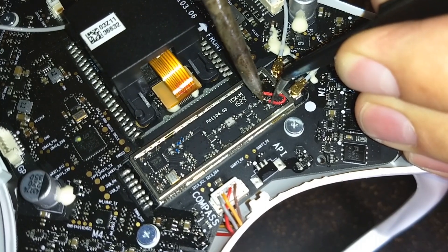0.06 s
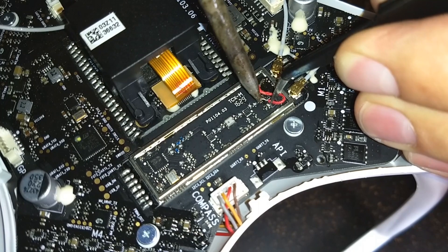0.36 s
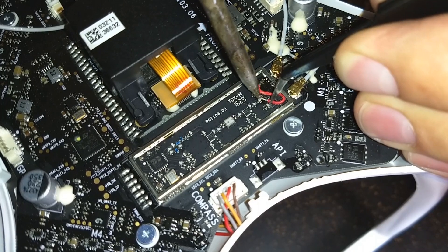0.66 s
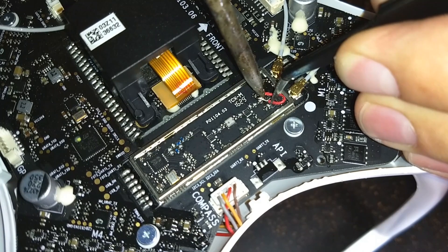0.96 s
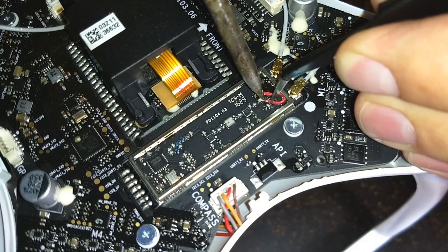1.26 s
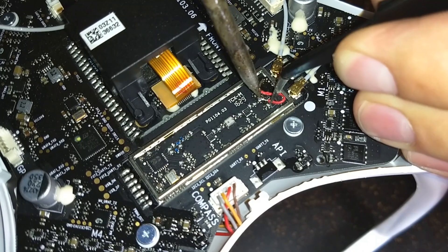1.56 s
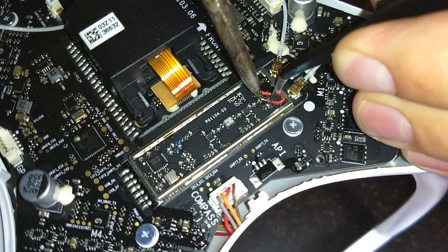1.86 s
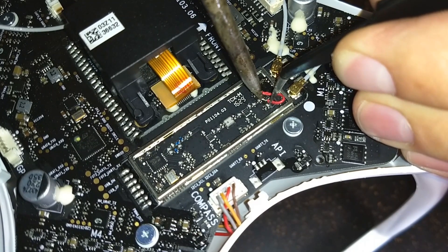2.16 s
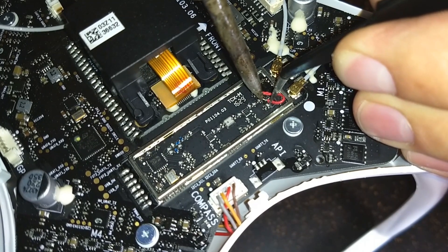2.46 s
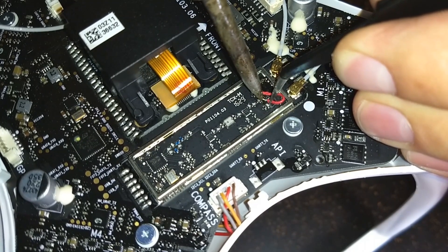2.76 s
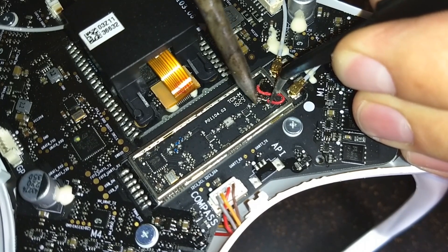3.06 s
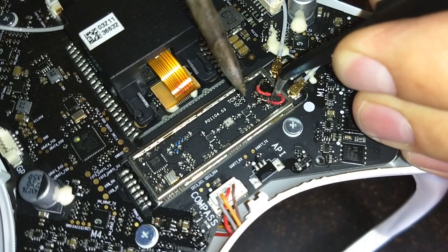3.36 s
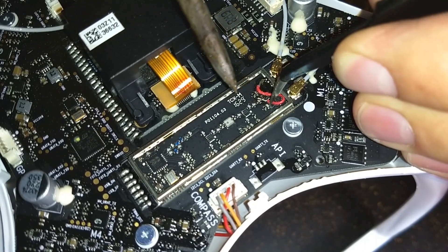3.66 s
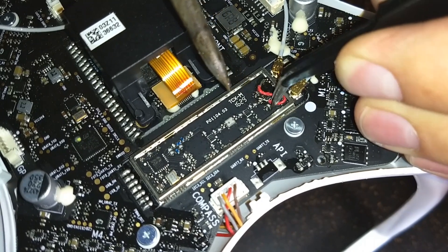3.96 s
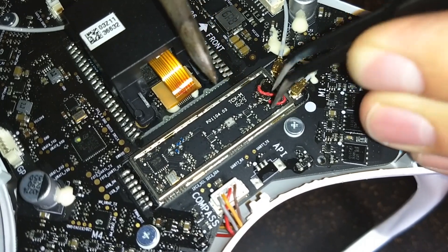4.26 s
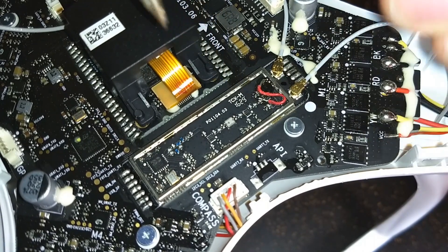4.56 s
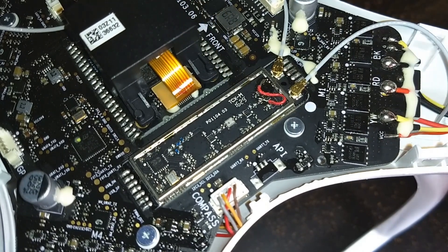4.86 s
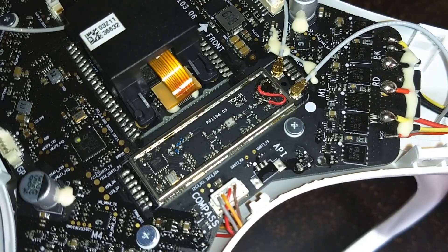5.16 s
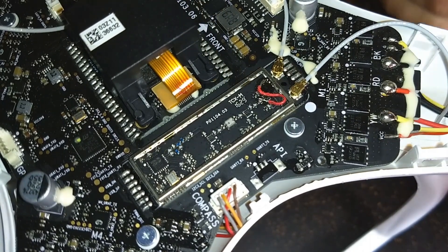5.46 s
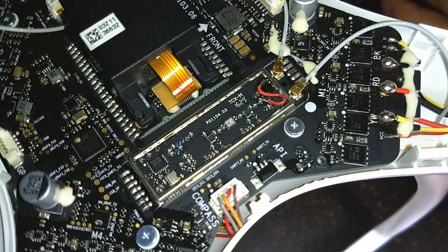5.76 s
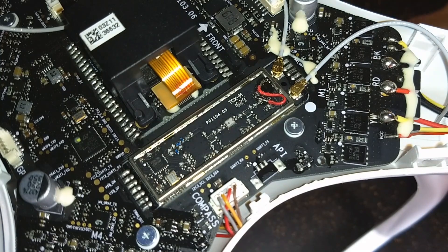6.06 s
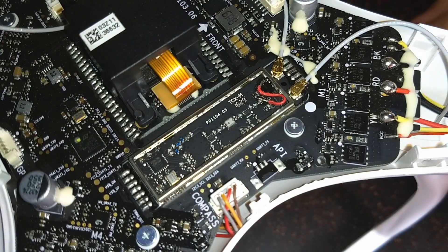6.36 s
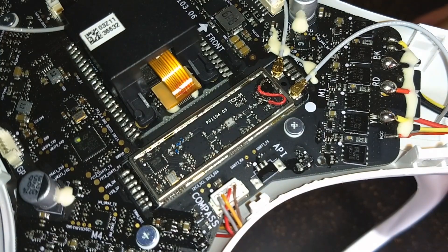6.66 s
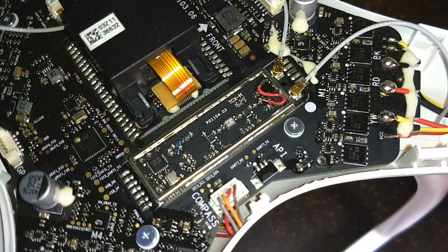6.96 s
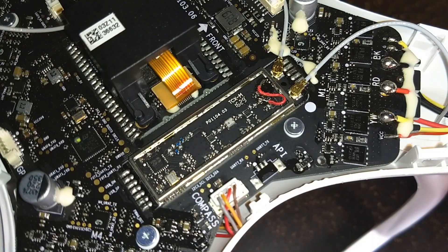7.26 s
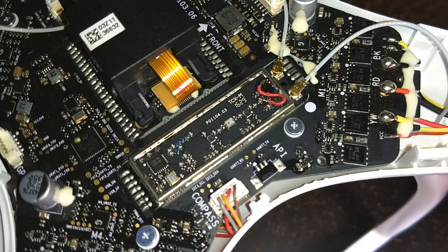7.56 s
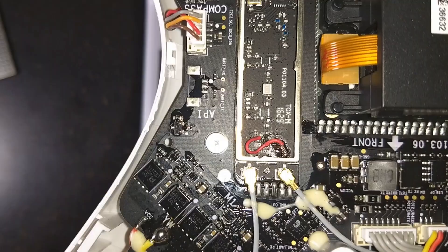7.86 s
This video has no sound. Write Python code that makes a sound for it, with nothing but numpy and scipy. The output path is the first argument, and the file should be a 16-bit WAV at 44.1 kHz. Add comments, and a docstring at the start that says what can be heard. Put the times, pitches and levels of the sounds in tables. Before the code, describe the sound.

Tiny crackles of sizzling flux and a few light tool taps on a circuit board are heard close up, over soft fan noise and electrical hum indoors. Cloth rustles faintly. Then the loudest sound: a soldering iron knocks, scrapes and clanks into its metal holder, rattling briefly. A sleeve rasps on the bench, and a dull bump with small clicks hits the microphone at the end.

```python
"""Soldering at the bench

A wire is soldered to a circuit board in a quiet, humming room: flux spits, iron and tweezers tick.
The iron knocks on its metal stand, slides in with a groan and drops home with a clank and a rattle.
A hand draws back, a sleeve brushes by, a finger bumps the camera and the sound cuts out for a moment.
The camera widens its two microphones by cross-feed."""
import sys
import numpy as np
from scipy import signal
from scipy.fft import rfft, irfft, next_fast_len
from scipy.io import wavfile
from scipy.ndimage import map_coordinates

SR = 44100
rng = np.random.default_rng(int(sys.argv[2]) if len(sys.argv) > 2 else 0)


def output_pcm(signal):
    """Save a mono or channel-first signal as 16-bit PCM at the path in sys.argv[1].

    Samples are clipped to [-1, 1] before scaling.
    """
    pcm = np.clip(np.atleast_2d(signal).T, -1, 1) * 32767
    wavfile.write(sys.argv[1], SR, np.round(pcm).astype(np.int16))


N = 349272
TIME = np.arange(N) / SR
EVENT_TIME = np.arange(SR // 2) / SR


# the iron hitting its stand: start_s, level_db, cutoff_hz, rattle_t60_s, base_db, holder_db, thud_db
STAND_HITS = [(5.7802, -20, 1510, 0.037, -31, -16, -10), (5.939, -48, 720, 0.03, -14, 0, -10),
              (6.123, -45.5, 700, 0.035, -25, -1.5, 2), (6.2005, -28, 7000, 0.01, -40, -40, -30),
              (6.2017, -8.5, 6740, 0.039, -28.5, -42, -23), (6.2486, -12.5, 13000, 0.051, -25, -35, -18),
              (6.2553, -16, 14000, 0.044, -29.5, -28, -20), (6.2609, -15.5, 9000, 0.06, -26, -29, -21),
              (6.269, -20.5, 4500, 0.097, -21, -27, -13)]
# tone of the clank: freq_hz, gain_db
CLANK_EQ = [(60, -15), (150, -3.5), (280, -9.5), (430, 1.5), (650, -5.5), (1100, -4), (1500, -2.5),
            (1850, -5.5), (2300, 6), (3100, -1.5), (4200, -10.5), (6000, -17.5), (9000, -22.5),
            (14000, -32)]
# ring of the stand's base: pitch_hz, level_db, t60_s
BASE_MODES = [(318, -7, 0.19), (408, 1, 0.14), (448, 6, 0.17), (567, -6, 0.19), (815, -4, 0.25),
              (837, -2, 0.26), (987, -2.5, 0.23), (1052, 0, 0.13), (1137, 0, 0.083), (1300, -22, 0.14),
              (1416, -6, 0.15), (1486, 5, 0.099), (1654, -12, 0.25), (1820, -8, 0.3), (2256, -5, 0.12),
              (1960, -7, 0.13), (2800, 3, 0.15), (3091, 2, 0.14), (3225, -1, 0.15), (3380, -5, 0.15),
              (3652, 0, 0.17), (5400, -18, .15)]
# ring of the holder that takes the barrel: pitch_hz, level_db, t60_s
HOLDER_MODES = [(309, -2, 0.14), (645, -3, 0.07), (716, 1, 0.2), (985, -11, 0.11), (1150, 0.5, 0.049),
                (1385, -5, 0.07), (1625, -5, 0.13)]
# thud of the bench: pitch_hz, width_hz, gain_db
BENCH_BODY = [(135, 70, 1), (318, 28, 16)]
def stand(scatter_db=1, crack_db=1.5, rattle_db=-0.5, thud_t60=0.07):
    """Each hit cracks, rattles, rings base and holder at new strengths and thuds into the bench."""
    out = np.zeros((2, N))
    base, holder = ringing(BASE_MODES), ringing(HOLDER_MODES)
    struck = lambda modes, db: amp(db + scatter_db * rng.standard_normal(modes.shape[1])) @ modes
    edge = amp(crack_db) * crack()
    for start, db, cutoff_hz, rattle_t60, base_db, holder_db, thud_db in STAND_HITS:
        rattle = amp(rattle_db) * burst(rattle_t60, colour(CLANK_EQ), alike_hz=750)
        ring = struck(base, base_db) + struck(holder, holder_db)
        thud = amp(thud_db) * burst(thud_t60, resonances(BENCH_BODY), alike_hz=298)
        add(out, start, amp(db) * (lowpass(edge + rattle + ring, cutoff_hz) + thud))
    return out


# direct hit and early reflections: delay_s, gain_db, right_lag_s
CRACK_PATHS = [(0, 4, 0.000073), (.0024, -3.5, 0.00013), (.0037, -1.5, 0.000056)]
def crack():
    """The sharp attack of a hit and its reflections off things nearby, peak 1."""
    right = np.array([[0], [1]])
    paths = lambda hz: sum(amp(db) * np.exp(-2j * np.pi * hz * (delay + lag * right))
                           for delay, db, lag in CRACK_PATHS)
    edge = filtered(signal.unit_impulse(len(EVENT_TIME)), lambda hz: colour(CLANK_EQ)(hz) * paths(hz))
    return edge / np.abs(edge).max()


# the barrel slipping in: peak_s, level_db, attack_s, t60_s, pitch_ratio
BARREL_SLIPS = [(5.79, -43.5, 0.0031, 0.4, 1.03), (5.85, -48, 0.0071, 0.16, 0.98),
                (5.877, -50.5, 0.0093, 0.17, 1), (5.941, -48, 0.0038, 0.13, 1.01),
                (5.962, -46, 0.0057, 0.13, 0.826), (5.975, -46, 0.01, 0.17, 1), (6.008, -51, 0.02, .3, .92),
                (6.128, -51, 0.0031, 0.082, 1)]
# groan of barrel on holder: pitch_hz, width_hz, gain_db
GROAN_BODY = [(458, 140, -9.5), (664, 51, 4), (1195, 30, -7), (1670, 51, -12.5), (2300, 650, -18)]
def barrel_slide(sink_per_s=1.1):
    """The barrel catches and slips in the holder; each slip's groan sinks in pitch as it goes in."""
    out, t = np.zeros((2, N)), EVENT_TIME
    slowing_time = (1 - np.exp(-sink_per_s * t)) / sink_per_s
    for peak, db, attack, t60, pitch in BARREL_SLIPS:
        groan = unit(filtered(noise(len(t), alike_hz=1370), resonances(GROAN_BODY, pitch)))
        sinking = np.array([np.interp(slowing_time, t, side) for side in groan])
        add(out, peak - attack, strokes([(attack, db, attack, t60)], t) * sinking)
    return out


# tips touching metal and board: start_s, level_db, cutoff_hz, tip_db, ping_db, pitch_ratio
TOOL_TICKS = [(0.9324, -42, 3200, -13, -23, 1.07), (0.963, -43.5, 1900, -8, -20, 1.2),
              (1.4895, -52, 2200, -1, -20, 1.1), (1.871, -42.5, 3200, -20, -22, 1.02),
              (2.124, -44, 1250, -20, -11, 1.02), (3.817, -48, 1000, -36, -15, 0.96),
              (4.0023, -45, 2300, -14, -20, 1.2), (4.283, -39.5, 2400, -0.5, -16, 1.06),
              (5.7801, -41, 1200, 0, -20, 0.77), (6.801, -48.5, 5000, -7, -25, 1.4)]
# circuit board's clack: pitch_hz, width_hz, gain_db
BOARD_BODY = [(1140, 100, -5.5), (1490, 310, -21.5), (2120, 470, -13.5), (2620, 160, -3.5), (3230, 260, -9)]
# steel tip's ring: pitch_hz, width_hz, gain_db
TIP_BODY = [(4900, 1400, 4), (6200, 470, 7.5), (8750, 4000, -16)]
# tips dragging along the wire: peak_s, level_db, attack_s, t60_s
TIP_DRAGS = [(0.94, -66.5, .03, 0.45), (1.47, -70, .2, 0.25), (3.405, -65.5, .015, 0.58)]
# tone of the scrape: freq_hz, gain_db
SCRAPE_EQ = [(600, -20), (1200, 0), (2000, -6), (3500, -9), (7000, -23)]
def tools(clack_t60=0.026, ping_t60=0.045, tip_t60=0.035):
    """Tips scrape the wire; each touch rings the steel and the board, whose pitch depends on the spot."""
    out = strokes(TIP_DRAGS) * noise_bed(colour(SCRAPE_EQ), alike_hz=1500)
    for start, db, cutoff_hz, tip_db, ping_db, pitch in TOOL_TICKS:
        clack = lowpass(burst(clack_t60, resonances(BOARD_BODY, pitch), alike_hz=1500), cutoff_hz)
        ping = ringing([(BOARD_BODY[0][0] * pitch, ping_db, ping_t60)])[:, 0]  # lowest mode
        tip = amp(tip_db) * burst(tip_t60, resonances(TIP_BODY), alike_hz=1500)
        add(out, start, amp(db) * (clack + ping + tip))
    return out


# spells of sizzle: start_s, length_s, level_db
FLUX_SPITS = [(0.913, 0.075, -64), (1.028, 0.074, -68.5), (1.205, 0.036, -67), (1.27, 0.24, -74)]
# larger bubbles bursting: start_s, level_db
FLUX_POPS = [(0.885, -52), (1.223, -55), (1.226, -51), (1.287, -60), (1.324, -54), (1.3776, -58),
             (1.408, -49.5), (1.4335, -50), (1.477, -56), (1.4897, -49)]
# tone of the sizzle: freq_hz, gain_db
FLUX_EQ = [(2500, -20), (4000, -10), (5000, -6), (6100, -6.5), (7500, -10), (10000, -12), (12000, -18),
           (16000, -24)]
def flux(bubbles_per_s=800, spread_db=3, pop_t60=0.024, pop_trim_db=-1):
    """Flux boils off the joint in spells of tiny bursting bubbles; larger ones snap singly."""
    arch = lambda progress: np.sqrt(np.sin(np.pi * np.clip(progress, 0, 1)).clip(0))
    envelope = sum(amp(db) * arch((TIME - start) / length) for start, length, db in FLUX_SPITS)
    strengths = rng.standard_normal((2, N)) * amp(spread_db * rng.standard_normal(N))
    bursting = rng.random(N) < bubbles_per_s / SR
    out = envelope * unit(filtered(strengths * bursting, colour(FLUX_EQ)))
    for start, db in FLUX_POPS:
        add(out, start, amp(db + pop_trim_db) * burst(pop_t60, colour(FLUX_EQ), alike_hz=1500))
    return out


# the camera's case clicking: start_s, level_db
CASE_TICKS = [(7.7616, -29), (7.8674, -32.5)]
# tone of a click: pitch_hz, width_hz, gain_db
CLICK_BODY = [(560, 270, 3.5), (920, 460, 0), (3040, 570, -0.5), (6040, 2300, -26)]
# the case creaking under the finger: peak_s, level_db, attack_s, t60_s
CASE_CREAKS = [(7.766, -40.5, 0.003, 0.1), (7.797, -41, 0.014, 0.24)]
# tone of a creak: pitch_hz, width_hz, gain_db
CREAK_BODY = [(139, 70, 5.5), (251, 150, -1.5), (404, 110, -9), (880, 440, -18)]
def finger_bump(bump_s=7.7616, rock_hz=61, rock_t60=0.15, tap_hz=280, tap_t60=0.0085, push_s=0.00097):
    """A finger taps the camera's case, which rocks on its mount, creaks and clicks."""
    out, t = np.zeros((2, N)), EVENT_TIME
    attack = 1 - np.exp(-t / 0.0011)
    rock = amp(-14.5 - 60 * t / rock_t60) * np.cos(2 * np.pi * rock_hz * t) * attack
    tap = amp(-14 - 60 * t / tap_t60) * np.sin(2 * np.pi * tap_hz * t)
    push = amp(-22) * (1 - t / push_s) * np.exp(-t / push_s)
    ports = np.array([[.82], [-1.15]])  # the two microphone ports are pushed opposite ways
    add(out, bump_s, (rock - tap) * ports + lowpass(push, cutoff_hz=1800))
    for start, db in CASE_TICKS:
        add(out, start, amp(db) * burst(0.017, resonances(CLICK_BODY), alike_hz=1400))
    return out + strokes(CASE_CREAKS) * noise_bed(resonances(CREAK_BODY), alike_hz=504)


# the hand drawing back: peak_s, level_db, attack_s, t60_s
HAND_RUSTLE = [(4.41, -60.5, 0.19, 7.2)]
# its soft swish: freq_hz, gain_db
RUSTLE_EQ = [(80, -22), (280, 5), (700, 0.5), (1400, -16), (3000, -14.5), (12000, -41)]
# sleeve brushing the bench: peak_s, level_db, attack_s, t60_s
SLEEVE_BRUSHES = [(7.47, -49, 0.042, 0.66), (7.895, -48.5, 0.086, 0.52)]
# its dry rasp: freq_hz, gain_db
RASP_EQ = [(300, 1), (900, -2.5), (1450, -3.5), (1800, -4), (2150, 0.5), (2800, -3), (3400, -7),
           (6000, -8.5), (9000, -18.5), (15000, -27)]
def sleeve(catches_per_s=350, grain_db=3):
    """Cloth rustles as the hand draws back, and rasps on the bench as the arm reaches for the camera."""
    rustle = strokes(HAND_RUSTLE) * noise_bed(colour(RUSTLE_EQ), alike_hz=304)
    weave = amp(grain_db * np.interp(TIME * catches_per_s, np.arange(N), rng.standard_normal(N)))
    rasp = unit(filtered(weave * noise(N, alike_hz=1180), colour(RASP_EQ)))
    return rustle + strokes(SLEEVE_BRUSHES) * rasp


# fader ride under all three layers: time_s, level_db
ROOM_TONE_RIDE = [(0.0, -74), (0.85, -75), (1.02, -74), (3.41, -75.5), (3.95, -75), (4.45, -71.5),
                  (4.67, -73.5), (5.71, -73.5), (6.12, -70.5), (7.41, -70), (7.6, -72.5), (7.8, -70)]
# room air and fan noise: freq_hz, gain_db
AIR_EQ = [(24, -40), (34, -14), (50, -8.5), (90, -2.5), (160, -5.5), (205, -4.5), (245, -10), (282, -5.5),
          (330, -11), (460, -13), (640, -13), (712, -10), (780, -18.5), (1300, -23.5), (3000, -37)]
# microphone hiss: freq_hz, gain_db
HISS_EQ = [(300, -15.5), (1500, 2), (4000, 0.5), (8000, -2.5), (12000, -5.5), (15000, -4.5)]
# mains hum and fan note: pitch_hz, level_db
HUM_TONES = [(120.4, -2), (97.6, -13.5)]
def room_tone(air_db=16, hiss_db=8, hum_db=15.5, air_swing=1.58, hum_swing=1.44):
    """Fan noise, microphone hiss and a slightly unsteady hum rise and fall together."""
    ride_db = np.interp(TIME, *np.transpose(ROOM_TONE_RIDE))
    swing_db = ride_db - ride_db.mean()
    air = amp(air_db + air_swing * swing_db) * noise_bed(colour(AIR_EQ), alike_hz=123)
    hiss = amp(hiss_db + swing_db) * unit(filtered(rng.standard_normal((2, N)), colour(HISS_EQ)))
    wobble = lambda: map_coordinates(rng.standard_normal(40), [TIME * 4])  # four new values a second
    tones = sum(amp(db + 0.66 * wobble()) * np.sqrt(2) * np.sin(2 * np.pi * hz * TIME + 0.21 * wobble())
                for hz, db in HUM_TONES)
    hum = amp(hum_db + hum_swing * swing_db) * tones * amp([[1], [-2]])  # leans left
    return amp(ride_db.mean()) * (air + hiss + hum)


# reverb decay: freq_hz, t60_s
ROOM_DECAY = [(150, 0.66), (500, 0.32), (2500, 0.3), (7000, 0.22), (15000, 0.13)]
def reverb(x, predelay_s=0.006):
    """A small room's tail; treble dies first."""
    hz, t, spectrum = signal.stft(noise(SR // 2, alike_hz=600), SR, nperseg=256)
    decay = amp(-60 * t / along(ROOM_DECAY, hz)[:, None])
    tail = signal.istft(spectrum * decay, SR, nperseg=256)[1]
    tail = np.pad(tail / np.linalg.norm(tail[0]), ((0, 0), (round(predelay_s * SR), 0)))
    return signal.fftconvolve(x, tail, axes=1)[:, :N]


def amp(db):
    """Decibels to gain."""
    return 10 ** (np.asarray(db) / 20)


def unit(x):
    """Scale to rms 1."""
    return x / np.sqrt(np.mean(x ** 2) + 1e-20)


def add(track, start_s, x):
    """Mix x into the track."""
    part = track[:, round(start_s * SR):][:, :x.shape[-1]]
    part += x[..., :part.shape[-1]]


def along(points, hz):
    """Read a (freq_hz, value) curve on a log axis."""
    freqs, values = np.transpose(points)
    return np.interp(np.log(hz + 1), np.log(freqs + 1), values)


def filtered(x, response):
    """Pass x through a complex frequency response."""
    n = x.shape[-1]
    padded = 2 * next_fast_len(n // 2 + 4096)
    return irfft(rfft(x, padded) * response(np.fft.rfftfreq(padded, 1 / SR)), padded)[..., :n]


def lowpass(x, cutoff_hz):
    """Two-pole roll-off: a softer contact has less treble."""
    return filtered(x, lambda hz: 1 / (1 + 1j * np.sqrt(2) * hz / cutoff_hz - (hz / cutoff_hz) ** 2))


def colour(points):
    """Minimum-phase EQ through (freq_hz, gain_db) points."""
    def response(hz):
        cepstrum = irfft(np.log(amp(along(points, hz))))
        half = len(cepstrum) // 2
        cepstrum[1:half] *= 2
        cepstrum[half + 1:] = 0
        return np.exp(rfft(cepstrum))
    return response


def resonances(body, pitch=1):
    """Response of a body's resonances, alternating in polarity and shifted by the pitch ratio."""
    return lambda hz: sum(
        (-1) ** k * amp(db) * 1j * hz * width / ((pitch * centre) ** 2 - hz * hz + 1j * hz * width)
        for k, (centre, width, db) in enumerate(body))


def ringing(modes, attack_s=0.00052):
    """One dying stereo sine for each (pitch_hz, level_db, t60_s) mode."""
    t = EVENT_TIME
    hz, db, t60 = np.transpose(modes)[:, :, None]
    # short waves reach the two microphones further out of step
    skew = rng.choice([-1, 1], hz.shape) * hz / 2300
    polarity = (-1) ** np.arange(len(modes))[:, None]
    sines = np.array([polarity * np.sin(2 * np.pi * hz * t + side * skew) for side in (1, -1)])
    return sines * amp(db - 60 * t / t60) * (1 - np.exp(-t / attack_s))


def noise(size, alike_hz):
    """White noise at two close microphones: mostly shared below alike_hz, unrelated above."""
    mid, side = rng.standard_normal((2, size))
    spread = lambda hz: np.arccos(.9 / (1 + (hz / alike_hz) ** 4)) / 2
    mid = filtered(mid, lambda hz: np.cos(spread(hz)))
    side = filtered(side, lambda hz: np.sin(spread(hz)))
    return np.array([mid + side, mid - side])


def noise_bed(response, alike_hz):
    """Scene-long filtered stereo noise, rms 1."""
    return unit(filtered(noise(N, alike_hz), response))


def burst(t60, response, alike_hz):
    """A dying rush of dense vibration through a body."""
    fade = amp(-60 * EVENT_TIME / t60)
    rush = filtered(noise(len(fade), alike_hz) * fade, response)
    return 0.8 * rush * np.linalg.norm(fade) / np.linalg.norm(rush)


def strokes(rows, t=TIME):
    """Envelope of strokes that rise evenly to their peak, then die away."""
    return sum(amp(db - 60 * np.maximum(t - peak, 0) / t60) * np.clip(1 + (t - peak) / attack, 0, 1)
               for peak, db, attack, t60 in rows)


def scene(reverb_db=-12.5):
    """Bench work with a little reverb; slide, sleeve and bump stay dry over the room tone."""
    bench = tools() + flux() + stand()
    return bench + amp(reverb_db) * reverb(bench) + barrel_slide() + sleeve() + finger_bump() + room_tone()


# stereo widening, before the left-right lean: freq_hz, share
CROSS_FEED = [(120, 0.11), (270, 0.2), (400, 0.01), (700, 0.48), (1100, 0.77), (2300, 0.94), (5800, 0.69),
              (7500, 0.25), (11000, 0.36), (15000, 0.06)]
# the dropout: mute_s, return_s, full_level_s
DROPOUT = (7.8308, 7.843, 7.864)
def record(dry, lean_db=-0.4, port_delay_s=1 / 2360, top_hz=15600):
    """Each channel subtracts a delayed share of the other; the sound cuts out briefly and fades back."""
    share = lambda hz: np.clip(along(CROSS_FEED, hz) * amp([[-lean_db], [lean_db]]), 0, 1)
    across = filtered(dry[::-1], lambda hz: share(hz) * np.exp(-2j * np.pi * hz * port_delay_s))
    wide = filtered(dry - across, lambda hz: 1 / np.sqrt(1 + share(hz) ** 2))
    gate = np.where(TIME < DROPOUT[0], 1, np.interp(TIME, DROPOUT[1:], [.07, 1]))
    return filtered(wide * gate, lambda hz: hz < top_hz)


dry = scene()
out = record(dry)
output_pcm(out)
```